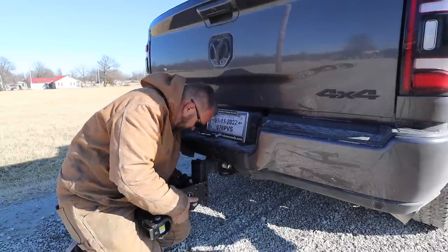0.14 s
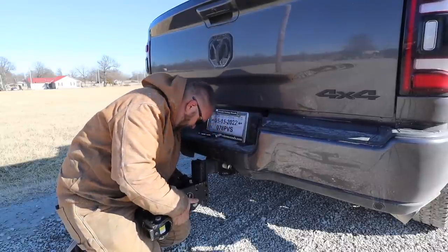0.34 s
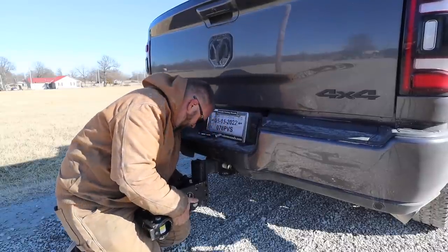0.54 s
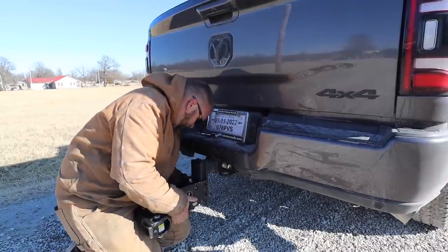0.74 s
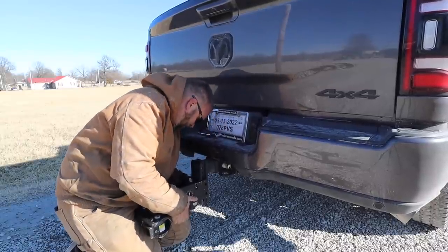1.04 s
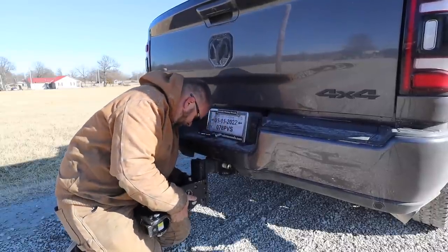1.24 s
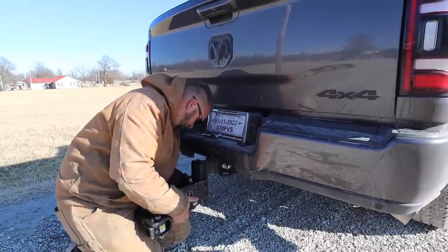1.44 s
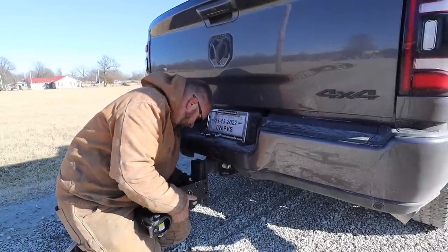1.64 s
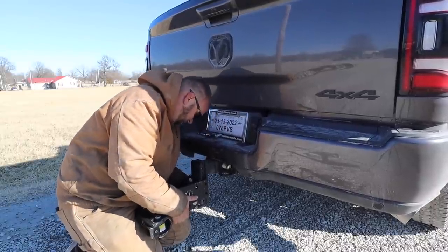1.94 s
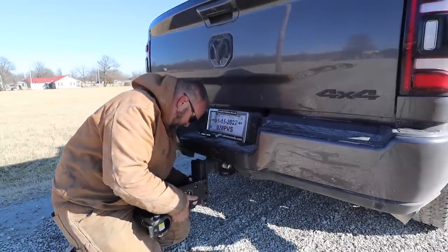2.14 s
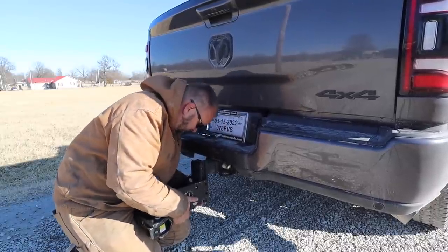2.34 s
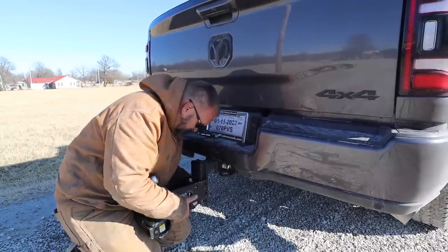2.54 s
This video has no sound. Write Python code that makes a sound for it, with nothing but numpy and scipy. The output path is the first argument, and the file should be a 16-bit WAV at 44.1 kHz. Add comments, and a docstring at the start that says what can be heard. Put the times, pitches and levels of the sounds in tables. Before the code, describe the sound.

A metal hitch piece rattles and clanks in a pickup's receiver tube in irregular bursts, with gritty scrapes, hollow thuds and brief bright rings, close to one microphone over a faint low outdoor hush.

```python
"""A low outdoor hush opens, with faint rumble and a grainy rustle, both coloured noise riding hand-drawn levels.
A steel hitch shank is then worked by hand in the receiver tube of a pickup, close to one microphone.
It scrapes (random slips ringing its modes) and clicks (a choked pitch, rough noise and a bright tick).
The truck frame thuds (noise through broad resonances with a pitched knock),
and now and then one mode of the shank sings out as a wavering sine."""
import sys
import numpy as np
from scipy import signal
from scipy.fft import rfft, irfft
from scipy.io import wavfile
from scipy.ndimage import uniform_filter1d

SR = 44100
rng = np.random.default_rng(int(sys.argv[2]) if len(sys.argv) > 2 else 0)


def generate_wav(sig):
    """Save sig (samples, or channels by samples) to the path in sys.argv[1] as 16-bit PCM at SR."""
    pcm = np.round(np.clip(np.atleast_2d(sig).T, -1, 1) * 32767).astype(np.int16)
    wavfile.write(sys.argv[1], SR, pcm)


N = 119070  # 2.7 s

# Spectrum of the outdoor air: pitch_hz, relative_db [dB per Hz]
HUSH_SPECTRUM = [(30, -2.5), (98, 4.5), (426, -22), (584, -11.5), (3580, -28.5), (5590, -32.5),
                 (16000, -37)]
# Spectrum of the low rumble: pitch_hz, relative_db [dB per Hz]
RUMBLE_SPECTRUM = [(20, -52), (64, -3.5), (124, -2.5), (157, -3.5), (260, -11), (340, -23.5), (570, -120)]
# Spectrum of the glove-and-steel rustle: pitch_hz, relative_db [dB per Hz]
RUB_SPECTRUM = [(150, -31), (250, 13), (1700, -24), (3010, -14.5), (9000, -46.5), (11700, -82),
                (19800, -120)]
# Level curves of the hand work: time_s, rumble_db, rubbing_db
HANDLING_LEVELS = [(0, -54, -61), (.22, -39, -47.5), (.31, -47.5, -63), (0.519, -47.5, -51.5),
                   (.75, -35, -45.5), (.95, -47.5, -49.5), (1.1, -36, -33), (1.28, -43, -61),
                   (1.47, -36, -51), (1.65, -40.5, -51.5), (2.0, -46.5, -54), (2.08, -59, -64.5),
                   (2.2, -55.5, -54.5), (2.42, -35.5, -54.5), (2.7, -60.5, -61.5)]
# Drags of the shank: start_s, hold_s, level_db, fade_t60_s, treble_slope_db [per octave above 3 kHz],
# ring_db [relative to the slips]
SCRAPE_EVENTS = [(0.067, 0.01, -43, 0.092, -12.5, -14), (0.331, 0.0091, -47, 0.27, -4, -11.5),
                 (0.557, 0.01, -41, 0.035, -16, -6), (0.576, 0.0094, -26.5, 0.1, -4.5, -6),
                 (0.783, 0.054, -43, 0.087, -5.5, -11), (0.839, 0.0055, -28, 0.078, 3.5, -10),
                 (1.030, 0.0048, -38.5, 0.15, -7, -5), (1.060, 0.016, -29.5, 0.096, 2, -9),
                 (1.317, 0.0067, -38.5, 0.13, -2.5, -3), (1.385, 0.013, -33, 0.1, 2, -2),
                 (1.419, 0.056, -39.5, 0.12, -16, -20), (1.577, 0.062, -61.5, .08, 1.5, -17),
                 (1.736, 0.024, -33, 0.15, -5.5, -11), (1.796, 0.012, -31.5, 0.16, 5, -8),
                 (2.233, 0.0054, -56, 0.12, -20, -28), (2.364, 0.01, -51.5, 0.057, 5.5, -24),
                 (2.379, .02, -34, 0.13, -23, -16.5)]
# Spectrum of the sliding steel: pitch_hz, relative_db [dB per Hz]
STEEL_SPECTRUM = [(710, -6), (1200, -0.5), (2450, -3), (3470, -1.5), (4550, -12), (5350, -4.5), (8910, -22),
                  (10900, -25.5), (16000, -39)]
# Ringing modes of the shank: pitch_hz, relative_db, free_t60_s
SHANK_MODES = [(1962, -1.5, 0.041), (2655, -23, 0.029), (2927, 1.5, 0.037), (3135, -0.5, 0.18),
               (3516, 4.5, 0.056), (3862, 6.5, 0.029), (4244, 2, .09), (4850, -3, 0.076), (5220, 3, 0.063),
               (5907, 2.5, 0.017), (6843, -2, 0.071), (7690, -4.5, 0.048), (9450, -8, .07),
               (10600, -10, 0.075)]
# Steel taps: start_s, level_db [relative], tube_pitch_hz, tick_db [relative to the click]
CLICK_EVENTS = [(0.074,-35,3270,-12),(.172,-38,1340,-9),(0.57,-29,1940,-19),
                (0.577,-20,2830,-4.5),(.591,-10,3420,-19),(0.619,-27,2840,-36),(.642,-30,2720,-42),(0.65,-34,2620,-25),
                (.707,-34,2390,-24),(0.792,-27,3070,-34),(0.799,-36.5,3680,6.5),(.821,-32,2020,-20),(0.843,-7.5,3020,-15.5),
                (0.876,-28,2720,-38),(0.895,-27,2800,-43),(0.912,-36,3220,-33),(0.938,-44,2600,-2),(0.966,-42,2620,-18),
                (.985,-34,2660,-22),(1.062,-37,3750,-23),(1.085,-17,2870,-35),
                (1.15,-38.5,3250,-42),(1.184,-34,2200,-36),(1.291,-53,2100,8),(1.388,-21.5,2290,-33),
                (1.395,-20,3390,-46),(1.434,-16,3040,-15.5),(1.464,-13,2870,-21),(1.537,-55.5,3700,12.5),(1.600,-45.5,4300,-1),(1.723,-28,1970,-24),
                (1.74,-7,3445,-12.5),(1.744,-15,3680,-17),(1.770,-21,2930,-35),(1.792,-17,2890,-37),(1.793,-18,3840,-27),(1.812,-8.5,3920,-4.5),(1.813,-13.5,2780,-30),
                (1.931,-46.5,3570,1.5),(1.975,-38.5,3150,-7.5),(2.109,-52.5,2940,6),(2.139,-49,2720,3),(2.278,-43,2670,-6),
                (2.388,-14,3050,-28),(2.394,-16,2910,-16),(2.47,-28.5,2740,-51),(2.640,-45.5,1456,0)]
# Shoves on the frame: full_level_s, level_db [relative], knock_pitch_hz, fade_t60_s
THUD_EVENTS = [(0.081, -31.5, 235, 0.14), (0.197, -39.5, 196, 0.057), (0.334, -18.5, 309, 0.1),
               (0.355, -28.5, 165, 0.48), (0.573, -16.5, 409.4, 0.19), (0.599, -17.5, 421, 0.3),
               (0.802, -29, 234, 0.57), (0.835, -17.5, 352, 0.16), (0.884, -28, 152, 0.59),
               (0.975, -30, 247, 0.22), (1.054, -19, 420.4, 0.39), (1.074, -12.5, 483, 0.11),
               (1.168, -27, 175, 0.38), (1.322, -37.5, 497, 1), (1.384, -22.5, 406, 0.41),
               (1.423, -19.5, 234.6, 0.3), (1.577, -33, 331, 0.16), (1.731, -16.5, 375.7, 0.26),
               (1.753, -17.5, 159, 0.29), (1.806, -21.5, 302, 0.31), (2.286, -34.5, 125, 0.09),
               (2.381, -21, 617, 0.33), (2.478, -31.5, 163.5, 0.12)]
# Broad modes of the truck frame: pitch_hz, nominal_width_hz, relative_db
FRAME_MODES = [(165, 44.3, 2.5), (297.4, 26, -14), (369, 81, -1.5), (428, 130, 0), (490, 175, 0.5),
               (632.3, 90, -8), (731, 165, -5.5), (1025, 55, -16), (1128, 32, -8.5), (1290, 1000, -9.5),
               (1496, 10, -17.5)]
# Single modes singing out: start_s, pitch_hz [the nearest shank mode sounds], level_db [before waver]
CLINK_EVENTS = [(0.575,5225,-29.5),(0.591,10640,-54.5),(1.07,5225,-34.5),
                (1.073,10640,-48.5),(1.400,10640,-54.5),(1.428,10640,-55),(1.456,10640,-60),
                (1.465,5225,-48.5),(1.741,4950,-32.5),(1.742,6852,-35),(1.785,10640,-52.5),(1.806,5225,-43),
                (2.396,6852,-46.5),(2.398,5225,-48),(2.432,3450,-59.5)]

MODE_SPREAD_DB = 3.5  # random spread of the shank mode levels from hit to hit
RING_RISE_S = 0.0023  # shared by the clinks and the free ring after a click


def amp(db):
    """Decibels to amplitude."""
    return 10 ** (np.asarray(db) / 20)


def evened(x):
    """Brings a sound to rms 1."""
    return x / np.sqrt(np.mean(x ** 2) + 1e-20)


def read(points, hz):
    """Reads a curve between its points on a log frequency axis."""
    f, value = np.transpose(points)
    return np.interp(np.log(hz + 1), np.log(f + 1), value)


def add(mix, start_s, sound):
    """Lays a sound into the mix, cut off at its end."""
    part = mix[round(start_s * SR):][:len(sound)]
    part += sound[:len(part)]


def resonate(x, hz, width_hz):
    """Two-pole resonance of gain 1 at its peak."""
    return signal.lfilter(*signal.iirpeak(hz, hz / width_hz, SR), x)


def coloured(x, points, slope_db=0):
    """Shapes a sound to a spectrum, tilted per octave above 3 kHz, at rms 1."""
    hz = np.fft.rfftfreq(len(x), 1 / SR)
    db = read(points, hz) + slope_db * np.log2(np.maximum(hz / 3000, 1))
    return evened(irfft(rfft(x) * amp(db), len(x)))


def shape(t, rise_s, hold_s, t60_s):
    """Smooth rise, then an exponential fade starting hold_s after the onset."""
    rise = np.sin(np.pi / 2 * np.minimum(t / rise_s, 1)) ** 2
    fade = amp(-60 * np.maximum(t - hold_s, 0) / max(t60_s, .004))
    return rise * fade


def grit(per_s, spread_db, size):
    """Random slips of either sign, a few of them large."""
    chance, size_luck, sign_luck = rng.random((3, size))
    strength = amp(-spread_db * np.log(size_luck + 0.00049))
    return (chance < per_s / SR) * strength * np.sign(sign_luck - .5)


def wander(span, size):
    """Random drift of rms 1, smoothed twice over a span in samples."""
    once = uniform_filter1d(rng.standard_normal(size), int(span))
    return evened(uniform_filter1d(once, int(span)))


def hush():
    """Steady outdoor air: coloured noise whose level drifts a little."""
    level_db = -54 + 0.61 * wander(4000, size=N)
    return amp(level_db) * coloured(rng.standard_normal(N), HUSH_SPECTRUM)


def rumble():
    """Low coloured noise that swells while the hands work."""
    time_s, rumble_db, _ = np.transpose(HANDLING_LEVELS)
    low = coloured(rng.standard_normal(N), RUMBLE_SPECTRUM)
    return low * amp(np.interp(np.arange(N) / SR, time_s, rumble_db))


def rubbing():
    """Glove and steel keep brushing: dense tiny slips make a faint grainy rustle."""
    time_s, _, rubbing_db = np.transpose(HANDLING_LEVELS)
    slips = grit(per_s=3200, spread_db=1.5, size=N) * amp(3.5 * wander(700, size=N))
    return coloured(slips, RUB_SPECTRUM) * amp(np.interp(np.arange(N) / SR, time_s, rubbing_db))


def scrapes():
    """The shank drags over the tube wall: dense gritty slips feed its modes, each time in another mix."""
    out, t = np.zeros(N), np.arange(0, .3, 1 / SR)
    for start_s, hold_s, level_db, t60_s, slope_db, ring_db in SCRAPE_EVENTS:
        slips = grit(per_s=3000, spread_db=2.5, size=len(t)) * amp(2.1 * wander(70, size=len(t)))
        slips = coloured(slips, STEEL_SPECTRUM, slope_db) * shape(t, 0.0019, hold_s, t60_s)
        mix_db = MODE_SPREAD_DB * rng.standard_normal(len(SHANK_MODES))
        ring = np.zeros(len(t))
        for (hz, mode_db, mode_t60_s), luck_db in zip(SHANK_MODES, mix_db):
            # contact damps each mode below its free t60; the root offsets the weaker drive of narrow modes
            mode = resonate(slips, hz, 3.17 / mode_t60_s) * np.sqrt(mode_t60_s / 0.0059)
            ring += amp(mode_db + luck_db) * mode
        add(out, start_s, amp(level_db) * (slips + amp(ring_db) * ring))
    return out


def clicks():
    """Steel taps steel: a tube pitch and nearby shank modes, choked at once, a faint free ring, a bright tick."""
    out, t = np.zeros(N), np.arange(0, .12, 1 / SR)
    tick_band = signal.butter(1, [5000, 8500], "band", fs=SR)
    hz, mode_db, mode_t60_s = np.transpose(SHANK_MODES)[:, :, None]
    for start_s, level_db, tube_hz, tick_db in CLICK_EVENTS:
        rough_noise, tick_noise = rng.standard_normal((2, len(t)))
        level_luck, phase_luck = rng.standard_normal((2, len(hz), 1))
        modes = amp(MODE_SPREAD_DB * level_luck) * np.sin(2 * np.pi * hz * t + 2 * phase_luck)

        # modes weaken with the squared octave distance from the tube pitch
        near_db = -7.5 - 110 * np.log2(hz / tube_hz) ** 2
        pitched = np.sin(2 * np.pi * tube_hz * t) + (amp(near_db) * modes).sum(axis=0)
        rough_band = signal.butter(3, [tube_hz / 1.34, tube_hz * 1.34], "band", fs=SR)
        rough = evened(signal.lfilter(*rough_band, rough_noise))
        firm = np.clip((level_db + 47) / 20, 0, 1)  # light touches are rough and unpitched
        burst = (firm * pitched + 0.27 * rough) * shape(t, 0.00056, 0.0017, t60_s=0.02)

        ring = (amp(-40 + mode_db - 60 * t / mode_t60_s) * modes).sum(axis=0)
        ring *= np.minimum(t / RING_RISE_S, 1)
        tick = signal.lfilter(*tick_band, tick_noise) * shape(t, .0004, 0.0021, t60_s=0.0094)
        click = 0.066 * evened(burst) + ring + amp(tick_db) / 2 * tick
        add(out, start_s, amp(level_db) * click)
    return out


def thuds():
    """Each shove shakes the frame: a rough burst through its broad modes, with a firm knock at one pitch."""
    out, t = np.zeros(N), np.arange(0, .5, 1 / SR)
    rise_s, hold_s = 0.004036, 0.018
    for full_level_s, level_db, knock_hz, t60_s in THUD_EVENTS:
        shake = rng.standard_normal(len(t))
        body = np.zeros(len(t))
        for k, (hz, width_hz, mode_db) in enumerate(FRAME_MODES):
            # each pass is wider, so that two in a row come out near the nominal width
            pass_hz = 1.48 * width_hz
            mode = resonate(resonate(shake, hz, pass_hz), hz, pass_hz) / np.sqrt(width_hz)
            reach_db = -1.5 * abs(np.log2(hz / knock_hz))  # loss per octave away from the knock
            body += (-1) ** k * amp(mode_db + reach_db) * mode
        rough_knock = evened(resonate(resonate(shake, knock_hz, 100), knock_hz, 100))
        pure_knock = np.sin(2 * np.pi * knock_hz * t) * amp(-200 * t)
        knock = 2 * amp(-7.5) * (0.65 * rough_knock + pure_knock)
        thud = shape(t, rise_s, hold_s, t60_s) * (evened(body) + knock)
        add(out, full_level_s - rise_s, 0.4 * amp(level_db) * thud)
    return out


def clinks():
    """A single shank mode rings as a damped sine, wavering a little as the parts still touch."""
    out, t = np.zeros(N), np.arange(0, .15, 1 / SR)
    for start_s, pitch_hz, level_db in CLINK_EVENTS:
        hz, _, t60_s = min(SHANK_MODES, key=lambda mode: abs(mode[0] - pitch_hz))
        waver = wander(150, size=len(t))
        tone = np.sin(2 * np.pi * hz * t + 0.69 * waver)
        # contact shortens the free ring
        fade = shape(t, RING_RISE_S, hold_s=0.22 * t60_s, t60_s=0.71 * t60_s)
        add(out, start_s, amp(level_db + 2 * waver) * fade * tone)
    return out


def scene():
    """All layers summed, the same on both channels."""
    mono = hush() + rumble() + rubbing() + scrapes() + clicks() + thuds() + clinks()
    return np.array([mono, mono])


def record(dry):
    """One microphone on both channels: a steep low-pass at 16.3 kHz."""
    lowpass = signal.firwin(511, 16300, window=("kaiser", 9), fs=SR)
    return signal.oaconvolve(dry, lowpass[None], "same")


dry = scene()
out = record(dry)
generate_wav(out)
```